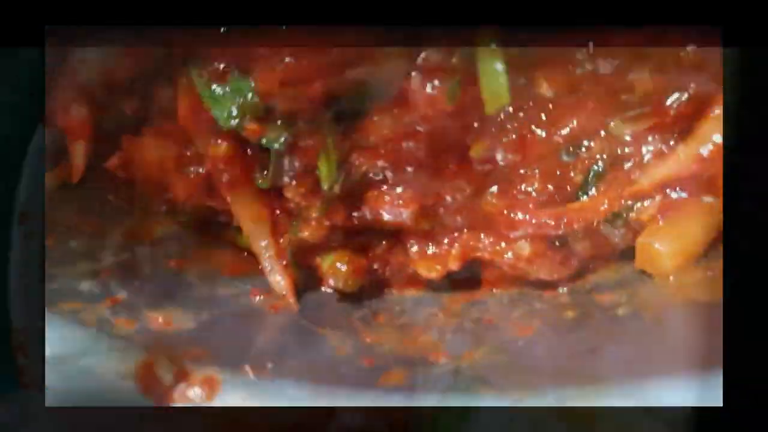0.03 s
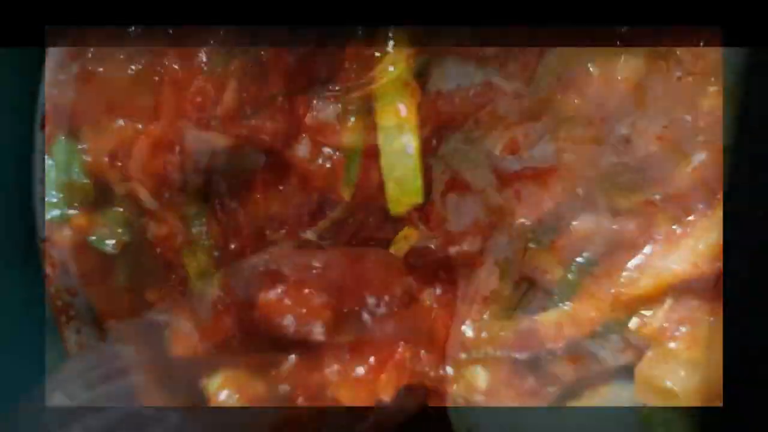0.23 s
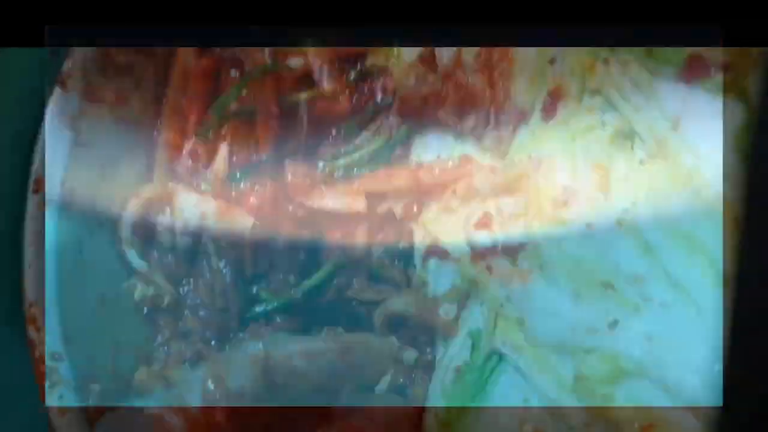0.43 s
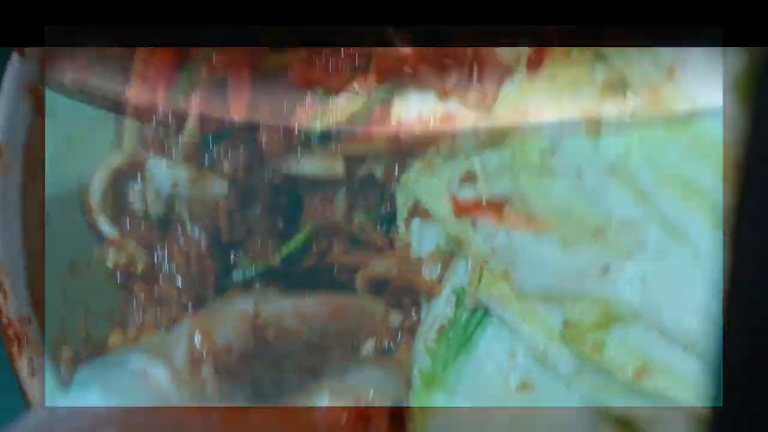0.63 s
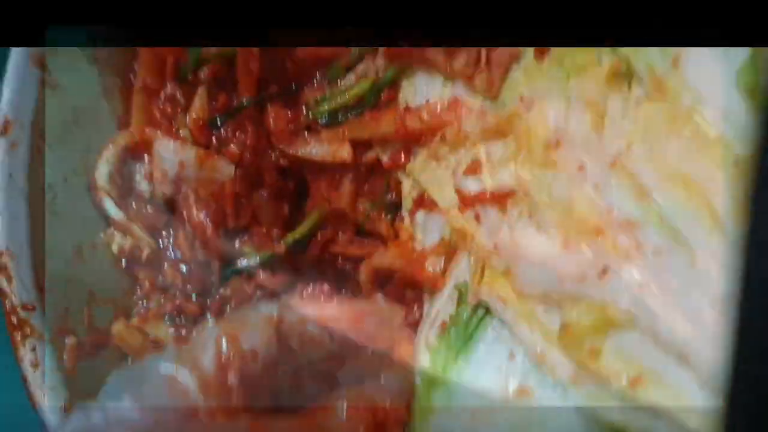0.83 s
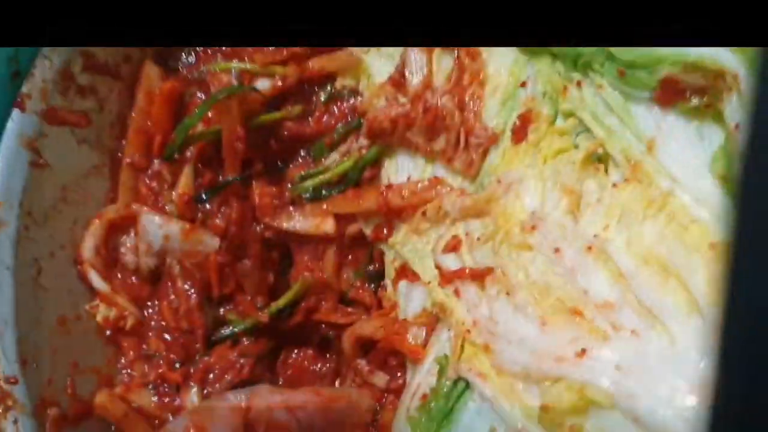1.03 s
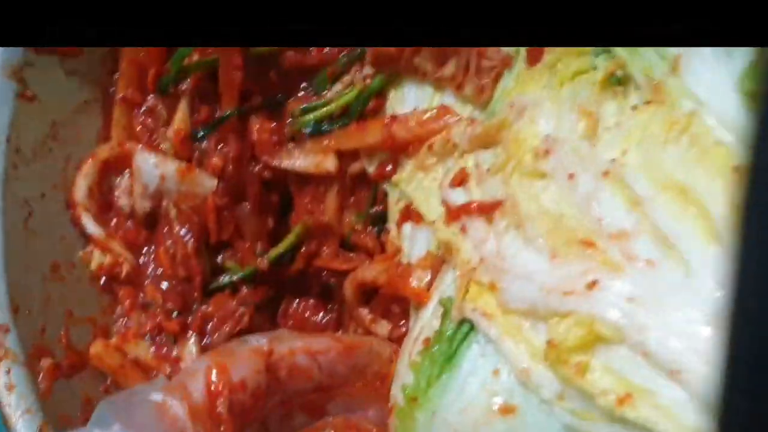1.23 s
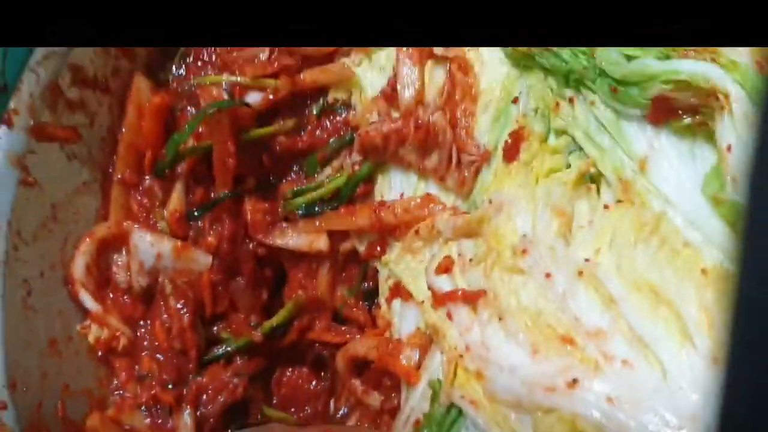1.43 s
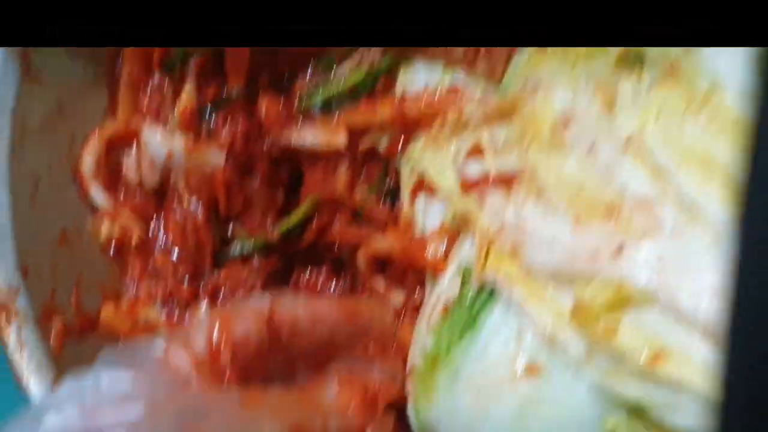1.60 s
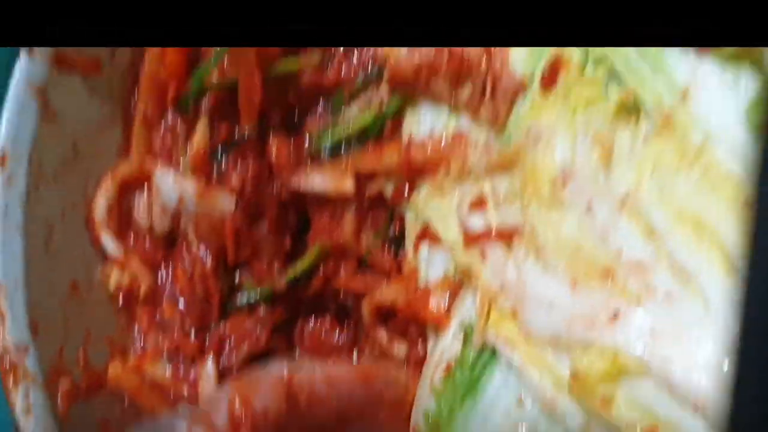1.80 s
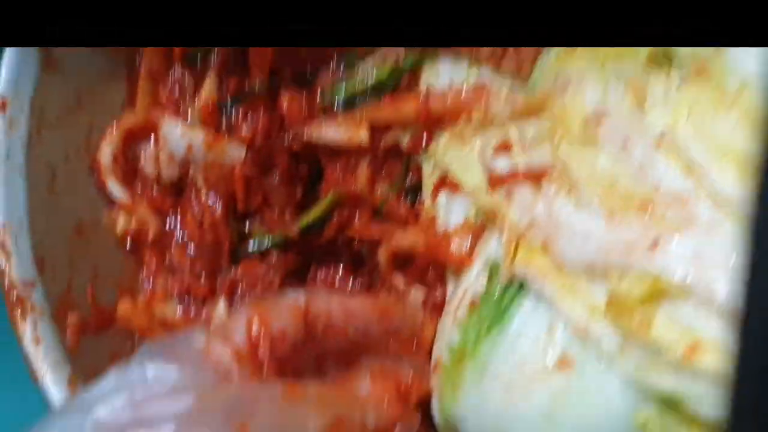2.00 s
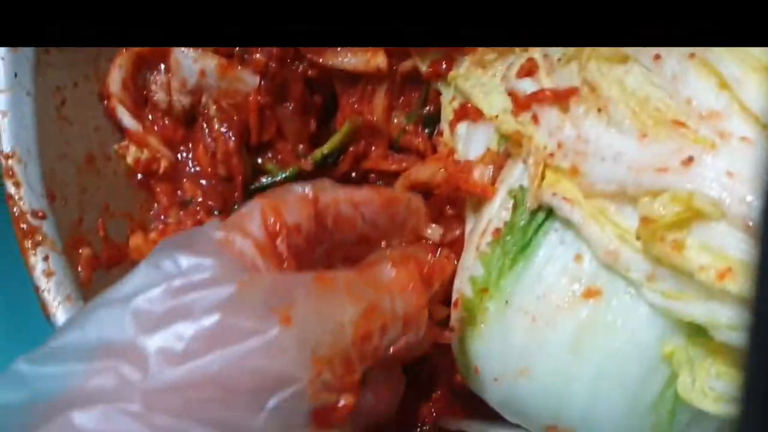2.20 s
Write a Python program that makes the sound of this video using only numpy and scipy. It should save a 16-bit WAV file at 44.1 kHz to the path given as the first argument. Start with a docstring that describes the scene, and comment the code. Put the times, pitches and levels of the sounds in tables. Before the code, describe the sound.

A thin plastic glove crinkles and snaps very close on the right, squeezing wet seasoning into cabbage with soft squelches and small plops. The bowl takes a few dull knocks between 0.3 and 0.7 seconds. On the left, a light crackle becomes steady rubbing at 0.7 seconds and stops short at 1.3. Separate squeezes follow, fading after 2.1 seconds into small sticky clicks, over low handling rumble.

```python
"""Gloved hand seasoning cabbage

A hand in a thin plastic glove works wet seasoning into cabbage in a bowl, very close to two microphones.
On the right the film crinkles and snaps with every squeeze, over soft squelches and plops of air.
On the left a light crackle grows into a steady rub that stops short. Early on, the bowl takes a few
dull knocks. Low handling rumble and faint hiss lie underneath."""
import sys
import numpy as np
from scipy import signal
from scipy.fft import rfft, irfft, next_fast_len
from scipy.io import wavfile

SR = 44100
rng = np.random.default_rng(int(sys.argv[2]) if len(sys.argv) > 2 else 0)


def unload_audio(sound):
    """Save the sound as a 16-bit wav file, at the path given as the first command line argument."""
    columns = np.transpose(np.atleast_2d(sound))
    # keep every value between -1 and 1, then stretch to whole-number steps
    steps = np.round(np.clip(columns, -1, 1) * 32767)
    wavfile.write(sys.argv[1], SR, steps.astype(np.int16))


N = 103635
T = np.arange(N) / SR

# how hard the glove is worked, as the envelope of its crinkle (time [s], relative level [dB])
SQUEEZE_ENVELOPE = [(0, -55), (.02, -54), (.18, -48), (.238, -40), (.275, -33.5), (.479, -39), (.535, -39),
                    (.70, -47), (.732, -39), (.744, -32), (.798, -29), (.85, -44), (.91, -32),
                    (.998, -36.5), (1.19, -34), (1.24, -26.5), (1.265, -35.5), (1.325, -48), (1.39, -34),
                    (1.425, -36), (1.465, -32), (1.51, -35.5), (1.548, -43.5), (1.636, -44), (1.645, -30.5),
                    (1.70, -39.5), (1.72, -44.5), (1.767, -39.5), (1.773, -31), (1.805, -33.5),
                    (1.852, -46.5), (1.908, -43.5), (1.945, -48), (2.001, -42), (2.005, -30), (2.02, -28.5),
                    (2.045, -35), (2.09, -38.5), (2.135, -51.5), (2.165, -50), (2.177, -42.5), (2.215, -41),
                    (2.255, -48.5), (2.35, -49)]
# snaps of the plastic film (time [s], level [dB], side [0 left, 1 right])
FILM_SNAPS = [(0.044, -35, 0), (.096, -30.5, 0), (.151, -37, 0), (0.276, -35, 0), (0.274, -22.5, 1),
              (.513, -33, 0), (0.702, -47, 0), (0.048, -33, 1), (0.245, -29, 1), (0.521, -24.5, 1),
              (.893, -30, 1), (1.135, -24, 1), (1.233, -20.5, 1), (1.642, -26.5, 1), (1.661, -27, 1),
              (1.773, -39, 1), (1.898, -38, 1), (1.962, -42, 1), (2.0022, -28, 1), (2.0091, -25, 1),
              (2.124, -40, 1), (2.189, -48, 1), (2.232, -35.5, 1), (2.275, -36.5, 1), (2.299, -36.5, 1),
              (2.312, -40.5, 1), (2.337, -39, 1)]
# how hard the surface on the left is rubbed (time [s], relative level [dB])
RUB_ENVELOPE = [(0.0, -45), (0.112, -43.5), (0.216, -55), (0.319, -48.5), (0.399, -56), (0.407, -50),
                (0.455, -47), (0.471, -47.2), (0.511, -39), (0.527, -50), (0.694, -40), (0.702, -39),
                (0.734, -36.5), (0.822, -36), (0.854, -41), (0.958, -36.5), (1.014, -42), (1.094, -36.5),
                (1.293, -44), (1.329, -24)]
# knocks on the bowl (time [s], left thump pitch [Hz], left thump level [dB], right thump pitch [Hz],
# right thump level [dB], tap level [dB], tap pan as left minus right [dB], contact time [s])
BOWL_KNOCKS = [(0.185, 113, -43, 101, -35, -50, 0, 0.0039), (.2736, 112, -13.3, 104, -15.5, -27, 14, .0008),
               (0.4296, 113, -28.5, 109, -36, -24.5, 4, 0.0013),
               (0.4949, 135, -20.5, 147, -28.5, -22, 3.5, 0.00068),
               (.5843, 104, -16.5, 78, -17.5, -17.5, 2.5, .00066),
               (.597, 75, -35, 75, -42, -26, -13, 0.0016), (.6588, 149, -25, 74, -20, -19.5, 4, .0004),
               (.84, 190, -49, 190, -52, -34, 16, 0.0017), (1.038, 154, -43, 154, -36.5, -36, -18, .003)]
# modes of the bowl, damped by its load (pitch [Hz], left gain [dB], right gain [dB], t60 [s])
DAMPED_MODES = [(347, -8.5, -22, .027), (625, -11.5, -6, 0.02), (874, -1.5, -12, 0.0062),
                (1050, -3, -13, 0.0088), (2210, -6, -15, .005)]
# wet squelch of the paste (time [s], level [dB])
SQUELCH_ENVELOPE = [(0, -74), (.12, -68), (.17, -51.5), (.22, -57), (.26, -44), (.42, -44), (.55, -53.5),
                    (.70, -60), (.78, -47.5), (.90, -47), (1.15, -63), (1.25, -40), (1.35, -54.5),
                    (1.45, -44.5), (1.60, -67.5), (1.67, -40), (1.74, -62), (1.80, -45), (1.87, -64),
                    (1.99, -68), (2.015, -44.5), (2.08, -49), (2.14, -67.5), (2.35, -65.5)]
# air pockets in the paste (time [s], pitch [Hz], level [dB], t60 [s], attack [s], pitch rise [Hz/s])
AIR_POCKETS = [(.150, 497, -32, 0.068, 0.0015, 3), (.337, 223.5, -14, 0.052, 0.0084, 1100),
               (1.657, 237, -33, 0.075, 0.0023, 400), (1.701, 130, -37, 0.11, .004, 100),
               (2.020, 226, -31, 0.087, 0.0021, 400), (2.022, 480, -35, 0.029, 0.0009, 0),
               (2.092, 1150, -48, 0.019, .001, 0)]
# wet clicks of paste leaving the glove (time [s], pitch [Hz], level [dB])
STICKY_CLICKS = [(.2745, 2900, -31), (1.883, 4800, -37), (1.899, 4600, -37), (1.9185, 4400, -35),
                 (2.1235, 3800, -40), (2.178, 4500, -41), (2.338, 4800, -44)]
# squirts of paste (peak time [s], half length [s], left level [dB], right level [dB])
PASTE_SQUIRTS = [(0.499, 0.01, -32, -37.5), (1.677, 0.01, -75, -49)]
# low handling rumble (time [s], relative left level [dB], relative right level [dB])
HANDLING_ENVELOPE = [(0, -39, -44.5), (.1, -55, -55), (.24, -49.5, -46), (.36, -57, -44), (.45, -40, -49),
                     (.62, -43, -50), (.75, -45, -55), (1.28, -49.5, -50.5), (1.35, -64, -51.5),
                     (1.50, -51, -54), (1.64, -52, -49), (1.71, -49.5, -45.5), (1.83, -42, -58),
                     (1.88, -62, -51.5), (1.99, -57, -54), (2.04, -53, -48), (2.17, -49, -55.5),
                     (2.23, -76, -52), (2.35, -69, -51)]

# tone of each layer, as an EQ curve (frequency [Hz], relative gain [dB])
CRINKLE_EQ = [(300, -58), (1100, -24.5), (2100, -14.5), (2900, -5), (4000, -4.5), (5600, -3.5), (8300, -10),
              (11000, -3.5), (13000, 1), (15500, -3.5)]
SNAP_EQ = [(300, -18), (1100, -29), (2100, -12.5), (3000, -2), (4800, 1), (8300, -4.5), (12000, 4),
           (15500, 5)]
CRACKLE_EQ = [(300, -5), (1100, -11.5), (2200, -4.5), (3300, -5), (4800, -4), (8300, -10), (12000, -3),
              (15500, -10)]
RASP_EQ = [(200, -9), (350, -3), (650, -1), (950, 0.8), (2000, -2), (3200, 1), (4400, 2.5), (6000, -0.5),
           (8300, -3.5), (12000, 0.5), (15500, -3)]
SQUELCH_EQ = [(60, 2.5), (150, -6), (230, 2.5), (310, 2), (400, -5.5), (600, 0.5), (800, -3), (1100, -6.5),
              (1800, -3.5), (3000, -17)]
SQUIRT_EQ = [(60, -10), (140, -10), (450, 4), (680, 7.5), (1250, 3), (1500, -11), (2500, -7), (5000, -44)]
RUMBLE_EQ = [(20, -17), (42, 2.5), (70, 8.5), (110, -1.5), (190, 0.5), (280, -5.5), (420, -27.5),
             (580, -17.5), (950, -46), (2000, -50)]
HISS_EQ = [(30, 16), (200, 17.5), (900, 4), (2000, 1.5), (3800, 11), (6000, -3), (9000, -8), (12000, 9),
           (15500, 4)]

CRINKLE_DB, CRACKLE_DB, RASP_DB, RUMBLE_DB, HISS_DB = 0.5, -1, 3, -5.5, -70  # layer faders
HIGH_CUT_HZ = 15800


def glove_crinkle():
    """Harder squeezes crease the film more often and more loudly, until the creases merge."""
    mean_squeeze_db = -36.5
    squeeze_db = envelope(SQUEEZE_ENVELOPE)
    effort = from_db(squeeze_db - mean_squeeze_db)
    clump_db = 1.5 / np.maximum(effort, .5) ** .41  # a hard squeeze evens out the texture
    creases = grains(4500 * effort, spread_db=.5, t60=.0011, clump_db=clump_db, clump_hz=38, noise_db=-3)
    crinkle = from_db(CRINKLE_DB + squeeze_db) * equalise(creases, CRINKLE_EQ)
    return crinkle + bowl_reflections(crinkle, db=-6.5, t60=.035)


def bowl_reflections(sound, db, t60):
    """Sound bounces around inside the bowl, leaving a dense, quickly dying tail."""
    age = T[:SR // 10]
    tail = rng.standard_normal(len(age)) * from_db(-60 * age / t60)
    tail *= from_db(db) / np.sqrt(np.sum(tail ** 2))
    return signal.fftconvolve(sound, tail)[:N]


def film_snaps():
    """A fold flips over in a bright burst a few milliseconds long."""
    level = np.zeros((2, N))
    for start, db, side in FILM_SNAPS:
        level[int(side)] += from_db(db) * burst(start, attack_s=.0009)
    return np.array([equalise(noise, SNAP_EQ) for noise in level * rng.standard_normal((2, N))])


def rubbing():
    """A light touch crackles; firm sliding merges the grains into a fuller rasp that stops short."""
    firm_s, crossfade_s, stop_s, release_s = .695, .012, 1.297, .004
    light_grains = grains(2200, spread_db=2, t60=.0031, clump_db=3.5, clump_hz=120, noise_db=8)
    firm_grains = grains(12000, spread_db=3, t60=.00056, clump_db=1.45, clump_hz=160, noise_db=0)
    crackle = from_db(CRACKLE_DB) * equalise(light_grains, CRACKLE_EQ)
    rasp = from_db(RASP_DB) * equalise(firm_grains, RASP_EQ)
    firmness = np.clip((T - firm_s) / crossfade_s, 0, 1)
    release = np.exp(-np.maximum(T - stop_s, 0) / release_s)
    return from_db(envelope(RUB_ENVELOPE)) * ((1 - firmness) * crackle + firmness * rasp) * release


def bowl_knocks():
    """Each knock is a thump and a tap that rings the bowl briefly; a longer contact sounds duller."""
    thump_lag_s, right_lag_s = .00032, .00166
    taps, out = np.zeros((2, 2, N))
    for start, left_hz, left_db, right_hz, right_db, tap_db, pan_db, contact_s in BOWL_KNOCKS:
        out[0] += thump(start + thump_lag_s, left_hz, left_db)
        out[1] += thump(start + thump_lag_s + right_lag_s, right_hz, right_db)
        taps += from_db([[tap_db + pan_db / 2], [tap_db - pan_db / 2]]) * contact(start, contact_s)
    for hz, left_db, right_db, t60 in DAMPED_MODES:
        out += from_db([[left_db], [right_db]]) * ring(taps, hz, t60)
    return out


def thump(start, hz, db):
    """A deep thud whose pitch drops at once and which dies in a few cycles."""
    decay_cycles, drop_cycles, drop_s = 5.2, .4, .0005
    age = np.clip(T - start, 0, .5)
    cycles = hz * age + drop_cycles * (1 - np.exp(-age / drop_s))
    return -from_db(db - 60 * hz * age / decay_cycles) * np.sin(2 * np.pi * cycles)


def contact(start, contact_s):
    """The force of one soft contact, with an area of 1."""
    progress = np.clip((T - start) / contact_s, 0, 10)
    force = progress * np.exp(-2 * np.pi * progress)
    return force / force.sum()


def paste_squelch():
    """The wet mass squelches as a swarm of tiny bursts."""
    bursts = grains(4000, spread_db=1.5, t60=.00084, clump_db=2.5, clump_hz=24.5, noise_db=-6)
    return from_db(envelope(SQUELCH_ENVELOPE)) * equalise(bursts, SQUELCH_EQ)


def air_plops():
    """An air pocket opens in the paste and rings unevenly; most bend up in pitch."""
    out = np.zeros(N)
    for start, hz, db, t60, attack_s, rise_hz_per_s in AIR_POCKETS:
        age = np.clip(T - start, 0, .5)
        level = from_db(db - 60 * age / t60) * (1 - np.exp(-age / attack_s))
        cycles = (hz + rise_hz_per_s * age / 2) * age
        out += level * np.sin(2 * np.pi * cycles)
    return out * (1 + .45 * drift(hz=120))


def sticky_clicks():
    """Paste unsticks from the glove: a sticky film tears in a short, narrow-band burst."""
    t60 = .0018
    out = np.zeros(N)
    for start, hz, db in STICKY_CLICKS:
        band = ring(ring(rng.standard_normal(N), hz, t60), hz, t60)
        out += from_db(db) * burst(start, attack_s=.001) * unit_rms(band)
    return out


def paste_squirts():
    """Paste pressed against the bowl squirts in quick swells of small wet bursts."""
    swells, out = np.zeros((2, 2, N))
    for peak_s, half_s, left_db, right_db in PASTE_SQUIRTS:
        swells += from_db([[left_db], [right_db]]) * np.exp(-.5 * ((T - peak_s) / half_s) ** 2)
    for side in range(2):
        bursts = grains(11000, spread_db=4, t60=.0014, clump_db=4, clump_hz=110, noise_db=5.5)
        out[side] = swells[side] * equalise(bursts, SQUIRT_EQ)
    return out


def rumble_and_hiss():
    """A bed of low handling rumble and faint microphone hiss, separate on each side."""
    times, *side_levels = np.transpose(HANDLING_ENVELOPE)
    sides = []
    for db in side_levels:
        handling = from_db(RUMBLE_DB + np.interp(T, times, db))
        rumble = handling * equalise(rng.standard_normal(N), RUMBLE_EQ)
        hiss = from_db(HISS_DB) * equalise(rng.standard_normal(N), HISS_EQ)
        sides.append(rumble + hiss)
    return np.array(sides)


def grains(per_s, spread_db, t60, clump_db, clump_hz, noise_db, pitches=16):
    """Tiny clicks, each ringing at one of several pitches over smooth noise, swell in clumps."""
    sizes = from_db(spread_db * np.minimum(rng.exponential(1, N), 4)) * rng.choice([-1, 1], N)
    clicks = sizes * (rng.random(N) < per_s / SR) / np.sqrt(per_s)
    band = rng.integers(0, pitches, N)
    rings = sum(ring(clicks * (band == k), (k + .5) * SR / 2 / pitches, t60) for k in range(pitches))
    texture = unit_rms(rings) + from_db(noise_db) * rng.standard_normal(N)
    return unit_rms(texture * from_db(clump_db * drift(clump_hz)))


def ring(x, hz, t60):
    """A resonator: a unit click sets off a dying sine of height 1."""
    r, w = from_db(-60 / (t60 * SR)), 2 * np.pi * hz / SR
    return signal.lfilter([0, np.sin(w)], [1, -2 * r * np.cos(w), r * r], x + 1e-18)


def equalise(x, curve):
    """Minimum-phase EQ, so nothing sounds ahead of an attack; white noise keeps its power."""
    size = 2 * next_fast_len(N // 2 + SR // 10)
    freqs = np.arange(size // 2 + 1) * SR / size
    hz, db = np.transpose(curve)
    gain = from_db(np.interp(np.log(freqs + 1), np.log(hz), db))
    gain /= np.sqrt(np.mean(gain ** 2 * (freqs < HIGH_CUT_HZ)))
    cepstrum = irfft(np.log(gain))
    cepstrum[1:size // 2] *= 2
    cepstrum[size // 2 + 1:] = 0
    return irfft(rfft(x, size) * np.exp(rfft(cepstrum)))[:N]


def drift(hz):
    """Smooth random modulation with an rms of 1, rolling off above hz."""
    pole = np.exp(-20 * np.pi * hz / SR)  # runs at a tenth of the sample rate
    noise = rng.standard_normal(N // 10 + 2002)
    slow = signal.lfilter([1], [1, -2 * pole, pole * pole], noise)[2000:]
    return np.interp(np.arange(N) / 10, np.arange(len(slow)), unit_rms(slow))


def burst(start, attack_s):
    """An envelope with a quick rise to 1 and a slower fall."""
    progress = np.clip((T - start) / attack_s, 0, 50)
    return progress * np.exp(1 - progress)


def envelope(points):
    """Straight ramps between breakpoints, at every sample."""
    return np.interp(T, *np.transpose(points))


def from_db(db):
    """Decibels to gain."""
    return 10 ** (np.asarray(db) / 20)


def unit_rms(x):
    """Scale to an rms of 1."""
    return x / np.sqrt(np.mean(x ** 2) + 1e-20)


def scene():
    """Each microphone hears almost only what is right next to it; the knocks and squirts reach both."""
    left = rubbing()
    right = glove_crinkle() + paste_squelch() + air_plops() + sticky_clicks()
    return np.array([left, right]) + film_snaps() + bowl_knocks() + paste_squirts() + rumble_and_hiss()


def record(dry):
    """A steep high cut on the whole mix."""
    return signal.sosfilt(signal.ellip(12, .1, 80, HIGH_CUT_HZ, fs=SR, output="sos"), dry)


dry = scene()
out = record(dry)
unload_audio(out)
```